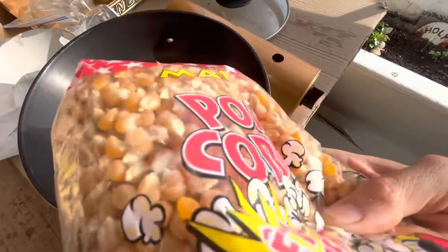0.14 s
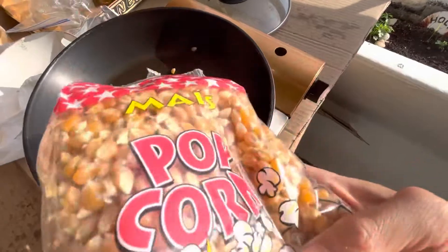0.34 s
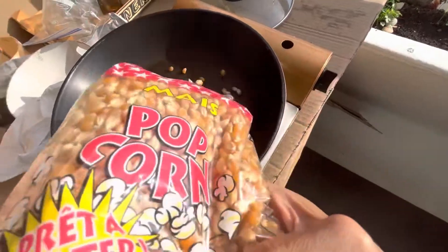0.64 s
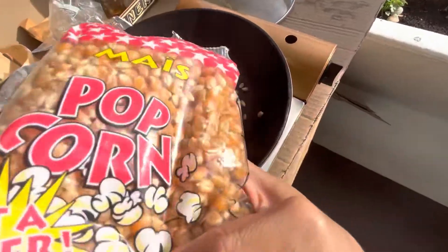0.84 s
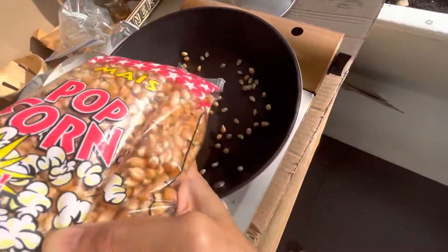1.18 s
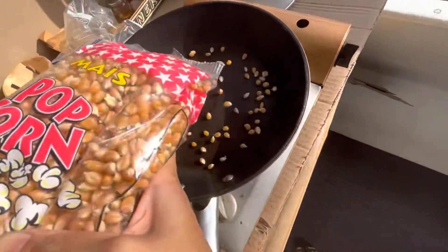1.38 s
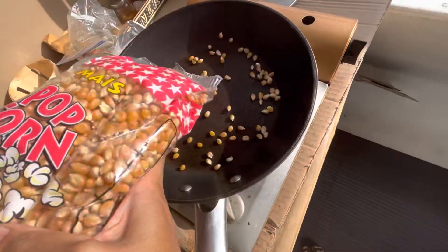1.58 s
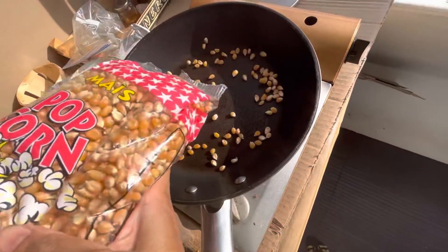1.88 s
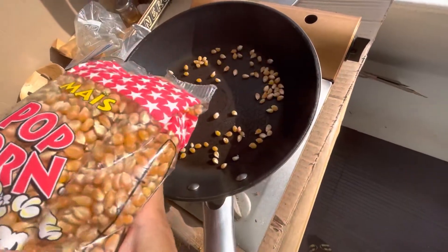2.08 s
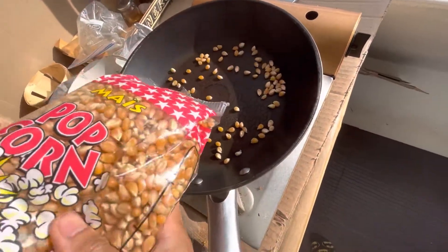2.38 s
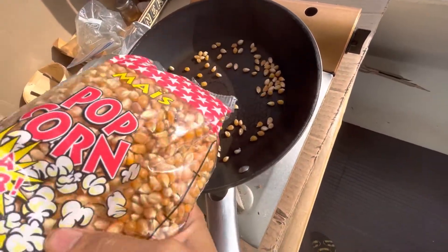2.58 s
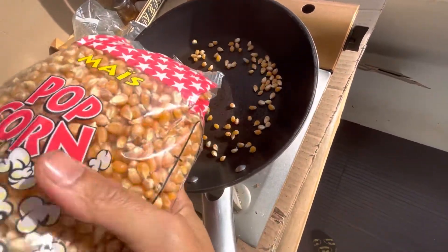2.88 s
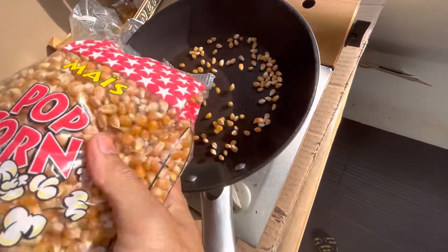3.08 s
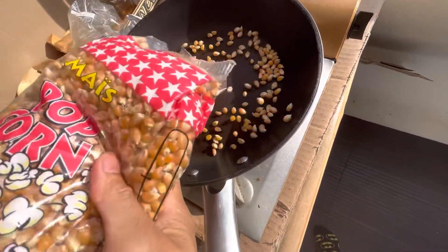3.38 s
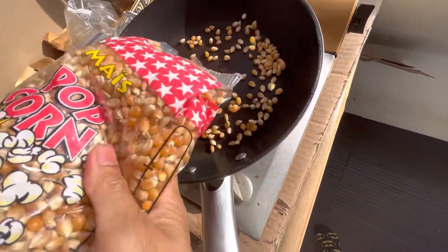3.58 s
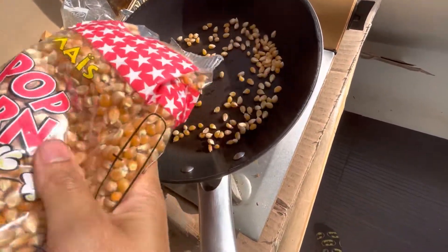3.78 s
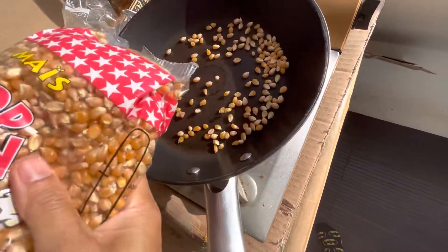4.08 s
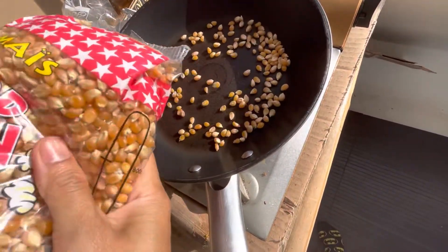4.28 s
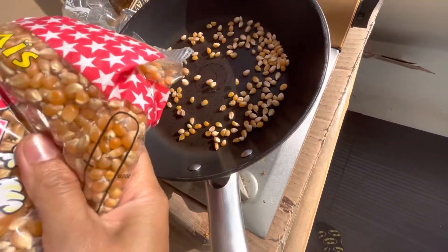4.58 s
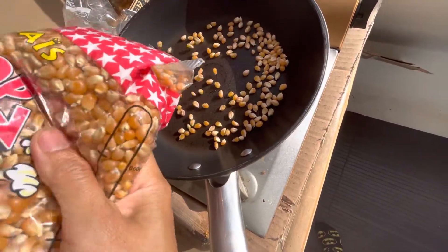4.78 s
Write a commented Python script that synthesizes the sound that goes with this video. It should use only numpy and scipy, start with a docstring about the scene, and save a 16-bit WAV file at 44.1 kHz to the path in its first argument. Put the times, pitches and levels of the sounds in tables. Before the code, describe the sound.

Dry corn kernels spill from a plastic bag into a bare metal frying pan, heard close in stereo in a small, barely reverberant room. From the start, hard bright ticks hit the pan in small groups, each with a short metallic ring and fine skittering bounces. Between about 0.4 and 1 second the bag rustles and snaps over them. From 1 to 1.9 seconds the rattle is dense and even, with little bag noise. Around 2 seconds the kernels almost stop while the plastic crackles sharply; only scattered hits follow until about 2.7. Near 3 seconds a burst of crinkling and a strong low pop accompany the renewed pour, thickest around 3.0 to 3.6. Afterwards clicks sound flatter and duller, steady but less splashy, with occasional plastic snaps at 3.9, 4.2, 4.4 and 4.86. The pour is still going at the end. A soft low rumble continues throughout.

```python
"""Small room: dry corn kernels trickle from a plastic bag into a bare metal frying pan.
Each blow rings the pan's modes (decaying close pairs) and a short noise wash of its many faint ones.
The bag snaps and crackles close to the microphones: noise cracks and sagging pops.
Worktop and walls answer briefly; a soft low rumble of shaped noise lies underneath."""
import sys
import numpy as np
from scipy import signal
from scipy.fft import rfft, irfft, next_fast_len
from scipy.io import wavfile
from scipy.ndimage import uniform_filter1d, map_coordinates

SR = 44100
rng = np.random.default_rng(int(sys.argv[2]) if len(sys.argv) > 2 else 0)


def volts_from_decibels(level):
    """Turn decibel levels (scalar or array-like) into linear amplitude factors."""
    exponent = np.asarray(level, float) / 20
    return 10 ** exponent


def persist_wave(psi):
    """Save psi, clipped to +-1, as 16-bit WAV."""
    counts = np.round(np.clip(psi, -1, 1) * 32767).astype(np.int16)
    wavfile.write(sys.argv[1], SR, np.atleast_2d(counts).T)


N = 218179


def along(points, hz):
    """Interpolates (frequency [Hz], value) points on a log frequency axis."""
    f, v = np.transpose(points)
    return np.interp(np.log(hz + 1), np.log(f + 1), v)


def filtered(x, response):
    """Multiplies the spectrum of x by a response of frequency."""
    m = next_fast_len(N + 8192)
    return irfft(rfft(x, m) * response(np.fft.rfftfreq(m, 1 / SR)), m)[..., :N]


def unit(x):
    """Scales to rms 1."""
    return x / np.sqrt(np.mean(x ** 2))


def wander(knots_per_s):
    """Slow random curve of rms 1 through random knots."""
    knots = rng.standard_normal(int(N * knots_per_s / SR) + 4)
    return unit(map_coordinates(knots, [np.arange(N) * knots_per_s / SR]))


def spikes(s, size):
    """One impulse of the given size at each time."""
    train = np.zeros(N, complex)
    np.add.at(train, np.clip(np.round(s * SR).astype(int), 0, N - 1), size)
    return train


def decay(train, t60_s, hz=0):
    """Each impulse starts a rotation at hz that dies 60 dB in t60_s."""
    pole = np.exp((2j * np.pi * hz - np.log(1000) / t60_s) / SR)
    return signal.lfilter([1], [1, -pole], train)


def pan():
    """Every contact excites modes and wash together; the left path is shaded by frequency."""
    # pan's path to the left microphone: (frequency [Hz], left minus right [dB])
    shade = [(900, -10), (2200, 0.5), (3100, -0.5), (5300, -18.5), (7000, -8), (9500, 0.5)]
    s, db, low_db, high_db = blows()
    middle_db = 1.1 * np.minimum(low_db + 15, 0)  # a glancing blow near the rim wakes only the treble
    out = modes(s, db, low_db, middle_db, high_db) + wash(s, db, middle_db, high_db)
    return filtered(out, lambda hz: np.array([volts_from_decibels(along(shade, hz)), 1 + 0 * hz]))


def blows():
    """All contacts with the pan: time, strength, and the low and high modes' shares."""
    # individually timed hits, strong and faint: (time [s], blow [dB], share of low modes [dB]) share near 0:
    # square on the flat bottom; far below: glancing off the rim
    hits = [(0.001, -24, -5.5), (0.067, -22, -11), (0.11, -17, -24), (0.152, -14.5, -25),
            (0.206, -18.5, -14), (0.261, -18.5, -25), (0.295, -15, -8.5), (0.337, -10, -28),
            (0.357, -19.5, -8.5), (0.477, -19, -15), (0.517, -42, -27), (0.575, -19.5, -22),
            (0.699, -21, -13), (0.753, -17, -47), (0.772, -22, -9.5), (0.886, -10, -44), (0.932, -19, -22),
            (0.952, -15.5, -8), (0.965, -16.5, -5.5), (1.001, -19.5, -6.5), (1.029, -22.5, -9),
            (1.06, -21.5, -17), (1.066, -22.5, -13), (1.105, -18, -8), (1.156, -14, -22), (1.181, -12, -45),
            (1.22, -15.5, -11.5), (1.253, -20, -19), (1.271, -15.5, -9.5), (1.398, -20.5, -13.5),
            (1.41, -21.5, -11), (1.504, -17, -19), (1.538, -20.5, -3), (1.554, -15.5, -8),
            (1.578, -20.5, -2), (1.593, -16.5, -5.5), (1.648, -19.5, -7.5), (1.664, -15.5, -7.5),
            (1.711, -20.5, -5.5), (1.763, -18.5, -9.5), (1.86, -15.5, -46), (1.914, -15.5, -56),
            (2.284, -22.5, -6), (2.423, -25, -6), (2.59, -23.5, -14), (2.625, -21, -15.5),
            (2.647, -21.5, -6.5), (2.748, -19, -18), (2.773, -15, -9.5), (2.894, -21.5, -19),
            (2.922, -13, -16), (3.033, -19.5, -12), (3.058, -14, -2.5), (3.077, -19, -1), (3.097, -21, -17),
            (3.149, -21.5, -9.5), (3.216, -17.5, -5), (3.237, -19.5, 0), (3.272, -15.5, -11.5),
            (3.288, -15, -10), (3.329, -22, -19), (3.361, -12, -18), (3.405, -15.5, -5.5),
            (3.467, -13, -28), (3.548, -21.5, -17), (3.582, -13, -21), (3.603, -15, -44),
            (3.659, -26.5, -8.5), (3.694, -20.5, -14), (3.757, -20.5, -1.5), (3.83, -16, -6.5),
            (3.873, -19.5, 0.5), (3.905, -23, -10), (3.955, -26.5, -4.5), (4.005, -30, -15),
            (4.03, -27, -13), (4.083, -21.5, -7.5), (4.116, -17.5, -5), (4.205, -18, -4),
            (4.229, -21.5, -7), (4.29, -26, -8), (4.33, -30, -8), (4.359, -23, -3), (4.447, -19, -6.5),
            (4.487, -23, -11), (4.518, -22, -6), (4.58, -20, -5.5), (4.614, -19, -6), (4.676, -16, -8.5),
            (4.691, -19.5, -2.5), (4.755, -21, 2.5), (4.783, -17.5, -7), (4.829, -15, -4), (4.907, -20, -2)]
    # small bounces and rolls: (time [s], faintest blow [dB])
    patter = [(0, -32), (.8, -35.5), (1.0, -30.5), (1.7, -30), (2.0, -44), (2.35, -58), (2.7, -40),
              (3.0, -29), (3.4, -25), (3.7, -41), (4.3, -62), (4.8, -29.5)]
    u = rng.random((700, 2))
    s = u[:, 0] * N / SR
    db = np.interp(s, *np.transpose(patter)) - 3 * np.log(1 - .95 * u[:, 1])  # many faint, a few strong
    small = np.column_stack([s, db, np.full(len(s), -10.5)])

    # kernels land in small groups, skip and knock their neighbours
    bounces = np.repeat(hits, 3, axis=0)
    late, size = rng.exponential(1, (len(bounces), 2)).T
    bounces[:, 0] += .003 + 0.018 * late
    bounces[:, 1] -= 5.34 + 3 * late + 4 * size

    s, db, low_db = np.vstack([hits, bounces, small]).T
    high_db = -8 + 3.5 * rng.standard_normal(len(s))
    return s, db, low_db, high_db


def modes(s, db, low_db, middle_db, high_db):
    """Decaying close pairs; where a kernel lands sets each mode's strength and phase anew."""
    # pan modes: frequency [Hz]
    mode_hz = [888, 945, 1900, 3128, 3750, 3844, 4732, 5922, 6270, 6778, 7020, 8463, 9458, 11316, 12118]
    # one row per mode: (relative level [dB], t60 of the lower partner [s], lead of the left [rad])
    mode_ring = [(-10.5, 0.19, -2), (2, 0.041, 1.3), (-7.5, 0.1, -2), (-6.5, 0.06, 1.62), (0.5, 0.022, 5),
                 (-5.5, 0.089, 0.5), (-12, 0.11, 7.5), (-5, 0.06, -3.5), (-21.5, 0.26, 5.5),
                 (-20.5, 0.18, -21), (-29.5, 0.18, -4.5), (-2.5, 0.057, 3.5), (-15.5, 0.078, -4.5),
                 (-7, 0.063, -1.6), (-3.5, 0.022, -9)]
    # left-right phase scatter from blow to blow: (frequency [Hz], scatter [rad])
    scatter = [(900, 1.06), (5000, 1.74), (12000, 0.19)]
    # flat-bottom modes over the pour: (time [s], level near 1.9 kHz [dB], level near 3.1 kHz [dB])
    pile = np.transpose([(.6, 9, 7), (1.6, 0, 3.5), (4.5, -4.5, -1)])
    split = 0.003  # half the pair's spacing, as a fraction of mode frequency
    luck = rng.standard_normal((len(s), len(mode_hz), 3, 2)).transpose(1, 2, 3, 0)
    out = np.zeros((2, N))
    for hz, (mode_db, t60_s, lead), (size, turn, side) in zip(mode_hz, mode_ring, luck):
        if hz < 2500:
            share_db = low_db
        elif hz < 5500:
            share_db = middle_db
        elif hz < 7300:
            share_db = 0
        else:
            share_db = high_db
        if 1500 < hz < 3500:
            share_db = share_db + np.interp(s, pile[0], pile[1 if hz < 2500 else 2])

        # size, turn: one draw for each partner of the pair
        right = volts_from_decibels(db + share_db + mode_db - 3.0 + 4.38 * size) * np.exp(2j * turn)
        left = right * np.exp(1j * (lead + along(scatter, hz) * side))
        low, high = (np.array([spikes(s, a), spikes(s, b)]) for a, b in zip(left, right))
        ring = decay(low, t60_s, hz * (1 - split)) + decay(high, 0.73 * t60_s, hz * (1 + split))
        ring -= decay(low + high, 0.0087, hz)  # the ring builds while the wave crosses the pan
        waver = np.exp(1j * 0.76 * hz / 3000 * wander(70))  # pitch wavers at random, blurring the tone
        out += (ring * waver).real
    return out


def wash(s, db, middle_db, high_db):
    """The pan's many faint modes: noise in three bands, its power following the blows."""
    # noise colour: (frequency [Hz], relative level [dB])
    colour = [(300, -109), (900, 1), (2600, -3), (4000, 7), (6200, 11.5), (8000, 7.5), (10300, 3.5),
              (11800, 8), (14500, 5), (15700, -48)]
    bands = [(0, 5500, middle_db + 4.0, .04), (5500, 7300, 1.5, .035), (7300, SR, high_db + 5.5, .026)]
    out = np.zeros((2, N))
    for lo, hi, share_db, t60_s in bands:
        power = spikes(s, volts_from_decibels(2 * (db + share_db)))
        body = np.abs(decay(power, t60_s / 2) - decay(power, 0.009))
        tick = volts_from_decibels(2.5) * decay(power, 0.00098).real  # a hard tick leads each wash
        fade = np.sqrt(body + tick)

        noise = rng.standard_normal((2, N))
        one, other = unit(filtered(noise, lambda hz: volts_from_decibels(along(colour, hz))))
        if hi == SR:  # treble: alike on both sides, about 0.2 ms early on the left
            left = filtered(one, lambda hz: np.exp(1j * (2.95 + (hz - 9460) / 740)))
        else:
            left = unit(other + 0.3 * one)
        pair = fade * np.array([left, one])
        out += filtered(pair, lambda hz: (hz >= lo) & (hz < hi))
    return out


def bag():
    """A crease snaps with a sharp crack, the sheet pops a few sagging cycles; faint ones make rustle."""
    # snaps: (time [s], pop level [dB], nominal pop frequency [Hz], crack against pop [dB])
    snaps = [(0.05, -28.5, 338, -23), (0.416, -20.5, 800, 0), (0.541, -25, 1050, -5), (0.643, -19, 915, -8),
             (0.655, -18, 960, -17), (0.719, -18.5, 1410, -28), (0.913, -20, 980, -16),
             (2.01, -15, 1250, -6), (2.091, -18.5, 2380, -1.5), (2.1, -19.5, 1210, -10),
             (2.182, -28, 1060, -2.5), (2.192, -22.5, 3030, -25), (2.408, -42, 1010, 15.5),
             (2.523, -30, 1100, 3.5), (2.557, -15.5, 2920, -7.5), (2.561, -17.5, 1030, -11),
             (2.668, -25, 434, 10.5), (2.808, -17.5, 1090, -28), (2.953, -21, 765, -10),
             (2.978, -17.5, 1060, 7.5), (2.983, -20.5, 497, 7.5), (2.99, -13.5, 1190, -20),
             (2.998, -23, 360, -19), (3.019, -22.5, 380, -17), (3.052, -9.5, 357, -0.5),
             (3.132, -18, 1060, 1), (3.334, -13, 1020, -21), (3.531, -13, 980, 1.5),
             (3.747, -24.5, 433, -26), (3.872, -10, 1090, -6.5), (4.194, -18, 990, -2.5),
             (4.367, -19.5, 2040, -18), (4.398, -30.5, 1000, 8), (4.858, -14.5, 1100, 1)]
    # loose rustle of the bag and the kernels inside it: (time [s], typical level [dB])
    rustle = [(0, -52.5), (.5, -31.5), (1.2, -53.5), (2.3, -48), (3.0, -30), (3.6, -40), (4.8, -45.5)]
    when = rng.random(900) * N / SR
    luck = rng.standard_normal((len(when), 3)).T
    loose_db = np.interp(when, *np.transpose(rustle)) + 4 * luck[0]
    loose = np.column_stack([when, loose_db, 1150 * np.exp(0.45 * luck[1]), -10 + 4 * luck[2]])

    out, t = np.zeros((2, N + SR)), np.arange(SR // 40) / SR
    since_s = t - .0015  # time from the crack's peak, where the pop begins
    for s, db, hz, crack_db in np.vstack([snaps, loose]):
        cycles = hz * np.maximum(since_s, 0)
        start = rng.normal(0, 1.0, (2, 1)) * min(hz / 900, 1)
        phase = 2 * np.pi * np.log(1 + 0.12 * cycles) * 9.84 + start
        pop = 2.01 * np.sin(phase) * np.exp(-cycles / 0.9) * (1 - np.exp(-cycles / 0.14))

        fall_db = 60 * np.where(since_s < 0, 3, 1) * np.abs(since_s) / 0.015  # rises thrice as fast
        noise = uniform_filter1d(rng.standard_normal((2, len(t))), size=2)
        crack = volts_from_decibels(crack_db - fall_db) * noise
        out[:, round(s * SR):][:, :len(t)] += volts_from_decibels(db) * (crack + pop)
    # a small sheet sends out no deep bass
    thin = filtered(out[:, :N], lambda hz: (1j * hz / (230 + 1j * hz)) ** 2)
    return thin * volts_from_decibels([[-1.5], [1.5]])


def room(x, t60_s):
    """Short diffuse answer from worktop and walls: convolution with decaying noise."""
    t = np.arange(SR // 4) / SR
    tail = rng.standard_normal((2, len(t))) * volts_from_decibels(-60 * t / t60_s) * (t > .002)
    return signal.fftconvolve(x, tail / np.linalg.norm(tail[0]), axes=1)[:, :N]


def rumble():
    """Steady air and distant machines: shaped noise, near mono in the bass and stronger there on the left."""
    # spectrum: (frequency [Hz], relative level [dB])
    spectrum = [(15, -30), (40, -10), (60, 3), (110, -4), (400, -1), (800, -13.5), (1500, -8.5),
                (6000, -14.5), (12000, -94)]
    # left-right likeness: (frequency [Hz], correlation [-1..1])
    alike = [(60, 1), (700, 0.024)]

    def mid_side(hz):
        """Mid and side gains that give the wanted correlation."""
        turn = np.arccos(np.clip(along(alike, hz), -1, 1)) / 2
        return volts_from_decibels(along(spectrum, hz)) * [np.cos(turn), np.sin(turn)]

    mid, side = filtered(rng.standard_normal((2, N)), mid_side)
    left = filtered(mid + side, lambda hz: volts_from_decibels(along([(90, 5.0), (400, -1.0)], hz)))
    return volts_from_decibels(-46.0) * unit(np.array([left, mid - side]))


def scene():
    """Pan and bag in a small room, over the rumble."""
    near = pan() + bag()
    return near + volts_from_decibels(-13) * room(near, t60_s=.16) + rumble()


def top_cut(x):
    """Nothing passes above the cut-off."""
    return signal.sosfilt(signal.butter(12, 16520, fs=SR, output="sos"), x)


def record(dry):
    """Finishes the mix: nothing passes above the recorder's cut-off."""
    return top_cut(dry)


dry = scene()
out = record(dry)
persist_wave(out)
```